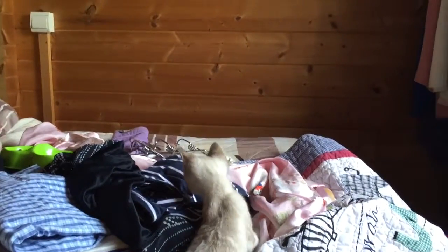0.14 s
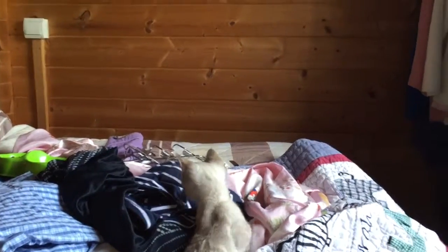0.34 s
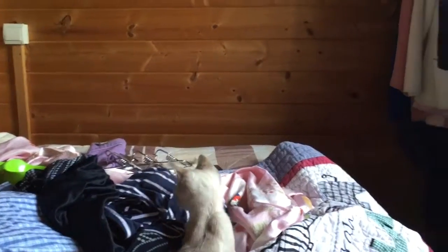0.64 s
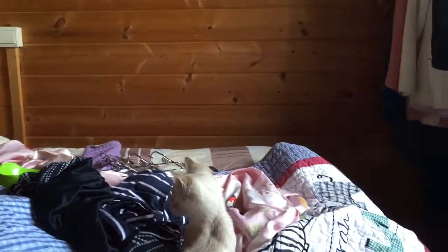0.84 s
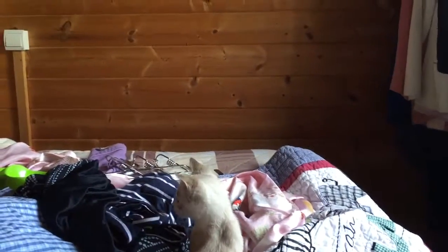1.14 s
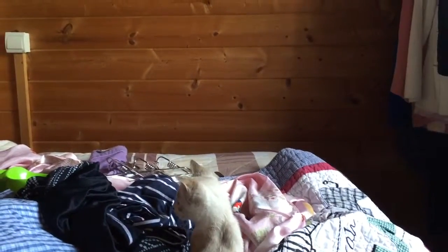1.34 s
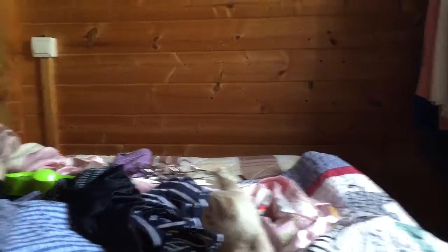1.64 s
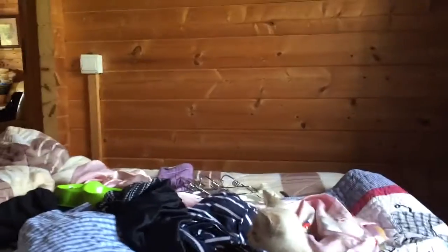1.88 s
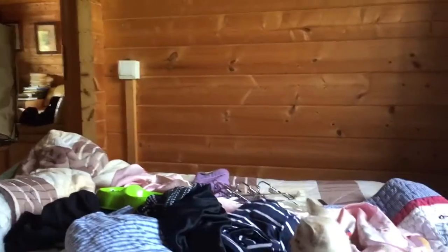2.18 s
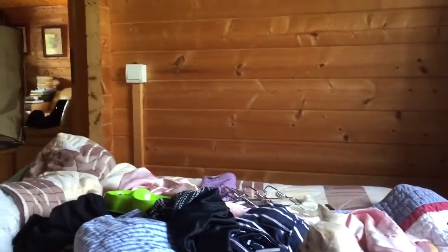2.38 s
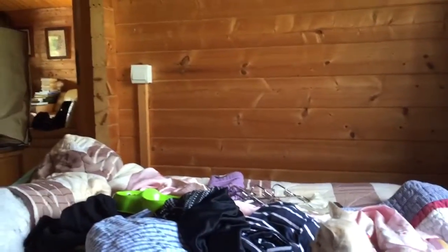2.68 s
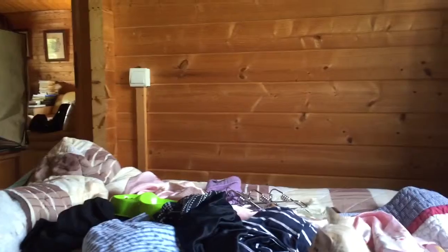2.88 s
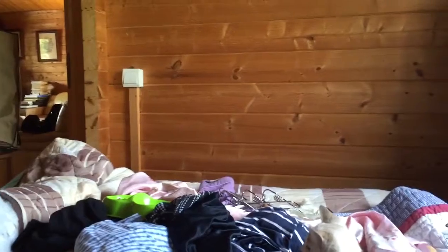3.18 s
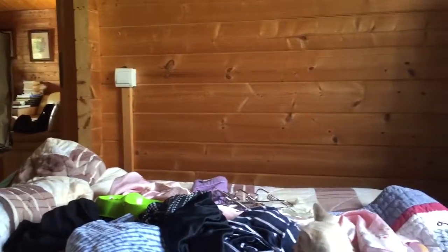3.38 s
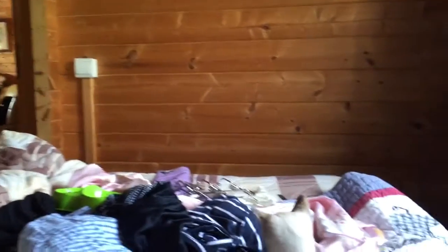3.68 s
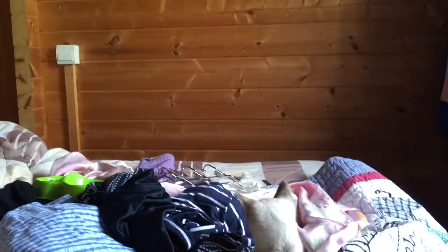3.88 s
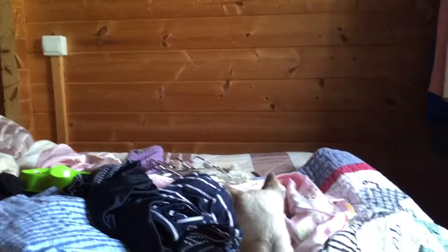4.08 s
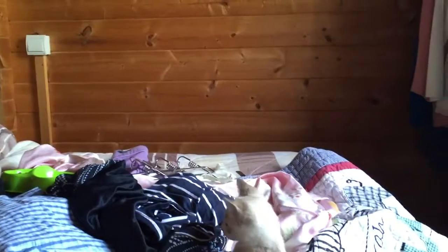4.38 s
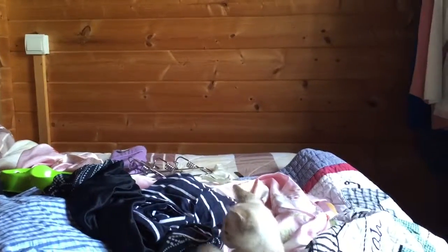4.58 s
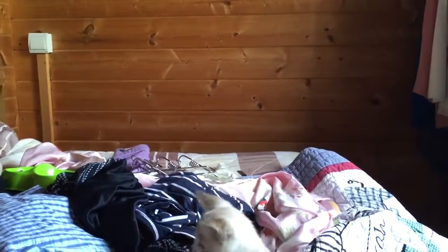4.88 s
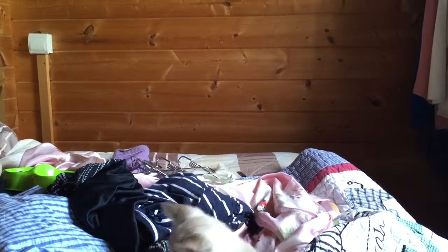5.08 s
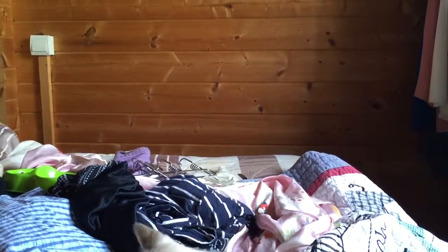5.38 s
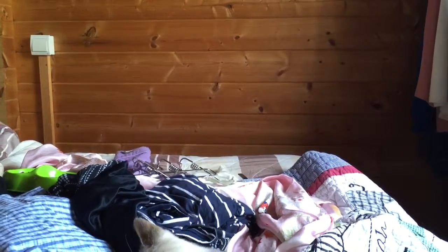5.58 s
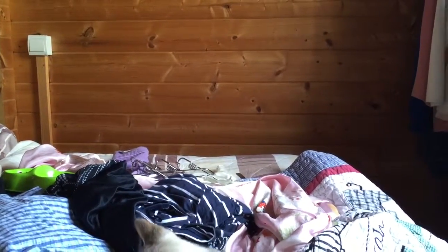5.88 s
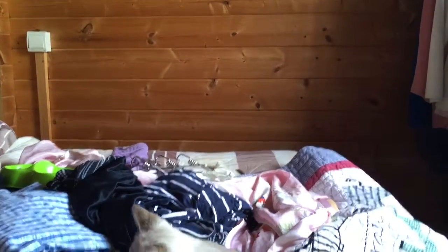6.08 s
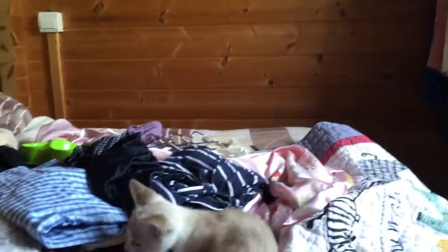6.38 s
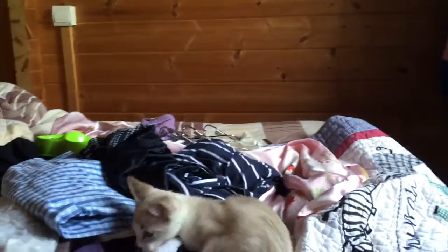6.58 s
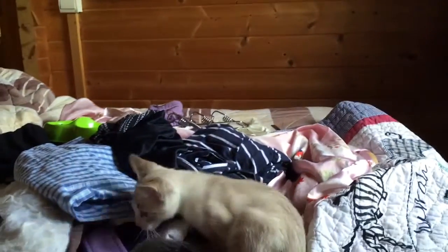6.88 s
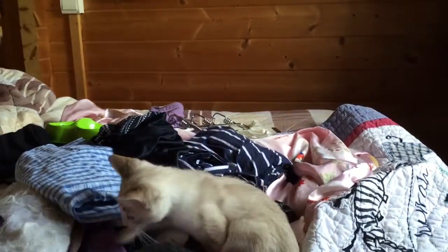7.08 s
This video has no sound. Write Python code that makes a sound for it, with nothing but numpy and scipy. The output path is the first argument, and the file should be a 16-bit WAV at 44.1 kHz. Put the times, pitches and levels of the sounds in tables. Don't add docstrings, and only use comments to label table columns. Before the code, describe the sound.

A small wooden room with very quiet, soft background air. From about 0.6 to 1.1 s a faint, very high thin whistle rides on a dog's breath; another, longer, sighs downward from 1.5 to 2.1 s, with tiny tag chinks and soft floor bumps. At 2.2 s a yelp falls steeply and sinks into a wavering whine until 2.8 s. Lip or claw ticks lead to a short, louder yelp at 3.0 s, with paw knocks on boards to 3.5 s and little peeps. Around 4.1 s comes a faint yelp, a small grunt and a weak whine to 4.6 s. A loud, hoarse bark bursts at 4.95 s, overloaded, its pitch dropping; a short whimper and whistle follow at 5.2-5.5 s, then a paw knock and a second, wider-open bark at 5.7 s. Short woody echoes. From 6.25 s, wavering whistles, breaths, paw thuds, a sniff at 6.85 s and a final squeak.

```python
import sys
import numpy as np
from scipy import signal
from scipy.fft import rfft, irfft, next_fast_len
from scipy.io import wavfile
from scipy.ndimage import uniform_filter1d, map_coordinates

SR = 44100
rng = np.random.default_rng(int(sys.argv[2]) if len(sys.argv) > 2 else 0)


def makeup_ratio(level_db):
    decades = np.asarray(level_db, float) / 20
    return 10 ** decades


def transcribe(signal):
    frames = np.atleast_2d(signal).T
    limited = np.clip(frames, -1, 1)
    pcm = np.round(limited * 32767).astype(np.int16)
    wavfile.write(sys.argv[1], SR, pcm)


N = 319119
TOP_HZ = 15560

# frequency_hz, density_db
HUSH_SPECTRUM = [(15, -45.5), (33, -11.5), (69, 3), (719, -14), (1650, -16), (2050, -14.5), (4020, -18.5),
                 (4980, -20), (9240, -22.5), (11800, -32), (13100, -29.5), (15400, -29.5)]
HUSH_DB = -71

# start_s, length_s, mouth_level_db, nose_level_db
PUFFS = [(0.621, 0.55, -75.5, -77.5), (1.456, 0.26, -64, -67), (1.74, 0.38, -66.5, -70.5),
         (2.047, 0.088, -63.5, -90), (2.129, 0.3, -70, -78), (3.364, 0.083, -76, -70.5),
         (3.497, 0.11, -66, -71), (4.171, 0.12, -65.5, -64.5), (2.175, 0.13, -57.5, -57.5),
         (2.814, 0.32, -61.5, -93.5), (3.579, 0.39, -67.5, -77.5), (3.905, 0.17, -69, -84),
         (4.6, 0.11, -68, -85.5), (5.402, 0.11, -68.5, -79.5), (5.597, 0.08, -60.5, -70),
         (6.297, 0.12, -61.5, -67), (6.471, .1, -70, -75.5), (6.718, 0.086, -71.5, -93),
         (6.83, 0.13, -70.5, -65.5), (6.992, 0.16, -59.5, -73.5)]
PUFF_PEAK, PUFF_FADE_DB = 0.38, -10
# frequency_hz, density_db
MOUTH_AIR = [(200, -8.5), (900, -7.5), (1550, -3.5), (2000, -8), (2550, -5.5), (3200, -7.5), (4200, -1),
             (5300, -6.5), (7000, -31.5)]
# frequency_hz, density_db
NOSE_AIR = [(5000, -14), (7000, -3.5), (9000, -4), (10500, -13.5), (13000, -15), (15500, -34)]

# start_s, pitch_hz, level_db, octave_level_db
STEADY_WHISTLES = [
    [(0.648, 6090, -62, -74), (0.658, 5987, -53, -63.5), (0.76, 5920, -46.5, -58),
     (0.798, 5908, -55.5, -66.5), (1.048, 5814, -46.5, -65), (1.13, 5817, -82, -80)],
    [(3.635, 5560, -67, -82), (3.65, 5690, -52.5, -66.5), (3.73, 5710, -64, -66), (3.782, 5700, -56.5, -65),
     (3.858, 5880, -61.5, -74), (3.9, 5560, -94, -111)],
    [(5.33, 5300, -86, -80.5), (5.382, 5390, -56, -58), (5.444, 5480, -62.5, -62),
     (5.466, 5500, -50, -50.5), (5.482, 5500, -51, -66.5), (5.53, 5210, -62.5, -62.5)],
]
# start_s, pitch_hz, level_db, octave_level_db
SIGH = [(1.49, 6020, -59, -81), (1.524, 5903, -40.5, -63), (1.604, 5890, -45.5, -72),
        (1.654, 5597, -44, -62), (1.73, 5630, -55.5, -73), (1.764, 5690, -52, -54),
        (1.964, 5473, -42, -57.5), (2.012, 5440, -52, -63), (2.07, 5400, -83, -92)]
# start_s, pitch_hz, level_db, octave_level_db
WAVERING_WHISTLES = [
    [(2.226, 6000, -50, -53), (2.238, 5816, -37, -38.5), (2.33, 5340, -53, -52), (2.352, 5605, -43.5, -49),
     (2.39, 5540, -45, -57), (2.402, 5590, -59, -88), (2.47, 5470, -85, -89)],
    [(6.27, 5720, -59.5, -56.5), (6.322, 5810, -42.5, -63), (6.448, 5380, -62.5, -65),
     (6.514, 5480, -35, -56), (6.562, 5457, -54, -63.5), (6.642, 5386, -43, -61), (6.73, 5570, -103, -99)],
    [(6.865, 5820, -72, -92), (6.873, 5800, -47, -46), (6.935, 5340, -44.5, -51), (6.973, 5470, -62.5, -52),
     (7.045, 5930, -50, -68), (7.141, 5480, -62, -105.5), (7.165, 5750, -85, -104)],
]
# start_s, length_s, first_pitch_hz, last_pitch_hz, peak_level_db
PEEPS = [(2.629, 0.25, 5475, 5530, -59), (3.057, 0.05, 5780, 5960, -48), (3.192, 0.1, 5710, 5670, -52.5),
         (3.478, .1, 6080, 5900, -58.5), (4.181, 0.13, 5970, 5670, -52), (4.302, 0.052, 5620, 5590, -63.5),
         (4.361, 0.36, 5690, 5720, -68), (4.536, 0.13, 5650, 5560, -57.5), (5.163, 0.037, 5390, 5330, -61),
         (6.817, 0.055, 6300, 6700, -57)]
PEEP_PEAK, PEEP_EDGE_DB = 0.37, -24
PEEP_OCTAVE_DB = -11.5
# start_s, length_s, pitch_scatter_percent
HOARSE_SPELLS = [(1.483, 0.26, 0.41), (2.216, 0.13, 1.53), (4.172, 0.086, 1.5), (4.539, 0.13, 0.93),
                 (6.254, 0.15, 0.96), (6.808, 0.08, 3.5), (6.998, 0.2, 1.7)]
# frequency_hz, level_db
MIXING_TONES = [(2200, -51.5), (3000, -33.5), (3700, -22), (4400, -21), (5000, -35.5), (6500, -38),
                (9500, -65), (13000, -59.5)]

# start_s, peak_level_db
TICKS = [(0.8844, -50), (1.586, -60), (2.6292, -48), (2.708, -43), (2.914, -46.5), (2.995, -38.5),
         (4.931, -52.5), (6.8394, -50.5), (3.645, -60.5), (6.38, -58)]
# start_s, peak_level_db, pitch_hz
CHINKS = [(1.1065, -62, 9150), (1.4721, -64, 9800), (2.0136, -55, 9035), (2.0515, -75.5, 8650),
          (3.956, -63, 9000), (5.292, -52, 9200), (5.6179, -49.5, 8800), (5.9874, -58.5, 8730),
          (7.0147, -53.5, 8720)]

# start_s, peak_level_db, low_knock_level_db, claw_level_db
PAWS = [(1.29, -39, -11.5, -43.5), (1.469, -55, -4, 2), (1.78, -52, 7, -17.5), (2.9239, -35, -8.5, -23),
        (3.1468, -23.5, -11, -42.5), (3.269, -17.5, -15, -29), (3.4411, -25.5, -9, -30.5),
        (3.963, -46.5, -5, -41), (5.5196, -17, -17, -32), (6.2401, -28.5, -13.5, -30),
        (6.5825, -20, -15, -31), (6.9366, -24.5, -12, -28)]
# frequency_hz, density_db
BOARDS = [(410, -35.5), (700, -18.5), (1120, -8), (1830, -4.5), (2060, -1.5), (2650, -11.5), (3670, -14.5),
          (4990, -24), (5570, -28), (7500, -41.5), (9750, -78), (16500, -120)]
# frequency_hz, density_db
LOW_KNOCK = [(150, -28.5), (300, -4), (700, 0.5), (1000, -33), (2500, -81)]
# frequency_hz, density_db
CLAW = [(3000, -61.5), (5500, -15), (7500, -5), (12000, -7.5), (15500, -13)]
# start_s, peak_level_db, pitch_hz, t60_s
THUMPS = [(1.301, -57.5, 61.9, 0.19), (1.81, -38, 134, 0.12), (2.928, -38.5, 166, 0.15),
          (2.997, -52, 209, 0.45), (3.15, -48.5, 82, 0.16), (3.16, -40.5, 170, 0.28),
          (1.305, -59.5, 180, 0.19), (3.671, -60, 130, 0.19), (3.278, -46, 231, 0.21), (3.5, -44, 230, 0.2),
          (3.599, -54, 74.5, 0.16), (3.971, -43, 223, 0.152), (4.348, -54, 143, 0.21),
          (5.358, -62, 58, 0.43), (5.523, -42, 194, 0.23), (5.725, -42.5, 41, 0.13), (5.66, -53, 59, 0.13),
          (5.2, -65, 60, 0.16), (5.98, -58, 234, 0.2), (6.246, -53, 224, 0.28), (6.588, -45, 240, 0.22),
          (6.712, -45, 79, 0.19), (6.801, -43.5, 71, 0.066), (6.942, -47.5, 240, 0.21),
          (7.089, -53, 68, 0.16), (6.8, -56.5, 61, 0.29), (5.35, -54.5, 360, 0.21),
          (4.955, -46.5, 170, 0.17)]

# start_s, length_s, pitch_hz
NARROW_BANDS = [(1.5, .11, 4050), (1.55, .09, 1450), (1.57, .06, 2450), (1.8, .11, 2450), (1.82, .16, 3700),
                (2.055, .07, 4000), (2.06, .04, 1200), (2.18, .08, 2400), (4.11, .08, 2400), (4.12, .06, 1800),
                (4.59, .045, 3850), (4.86, .05, 3800), (5.03, .1, 560), (5.2, .07, 4080), (5.31, .09, 4050),
                (5.88, .08, 520)]
NARROW_BAND_DB = [-69, -64, -73, -76, -71, -65, -64, -54, -65, -51, -62.5, -73, -40, -74, -61, -63]
NARROW_BAND_WIDTH = 0.047

# start_s, pitch_hz, level_db
YELPS = [
    [(2.205, 1493, -58), (2.219, 1453, -30), (2.257, 1362, -31.5), (2.31, 1098, -46), (2.335, 945, -31.5),
     (2.39, 903, -29.5), (2.415, 803, -25.5), (2.427, 740, -43)],
    [(3.008, 1223, -40), (3.024, 1168, -22), (3.034, 1095, -20), (3.043, 1122, -31), (3.05, 1117, -24),
     (3.064, 1082, -31.5), (3.072, 814, -38.5), (3.13, 686.5, -39), (3.165, 687, -34.5)],
    [(4.068, 965, -66), (4.088, 986, -47.5), (4.112, 1042, -41.5), (4.124, 932, -38), (4.165, 656, -40),
     (4.2, 617, -57)],
]
# start_s, pitch_hz, level_db
WHINES = [
    [(2.425, 732, -46.5), (2.44, 721, -32), (2.48, 677, -37), (2.53, 657.3, -42), (2.605, 682, -34),
     (2.668, 647, -45.5), (2.695, 658.8, -37.5), (2.725, 679, -43), (2.775, 676, -75)],
    [(4.25, 567, -54.5), (4.29, 583.5, -55.5), (4.41, 680, -41.5), (4.445, 634, -51), (4.465, 656, -42.5),
     (4.578, 664, -48), (4.61, 656, -79)],
    [(5.18, 687, -56.5), (5.22, 673, -34.5), (5.268, 646, -60), (5.29, 626, -45.5), (5.328, 680, -37),
     (5.36, 686, -62.5)],
]
# start_s, pitch_hz, level_db
GRUNT = [
    (4.191, 373, -63),
    (4.212, 367, -47.5),
    (4.25, 362, -73),
]
MANNER = [
    (0.04, 0.03),
    (0, 0.07),
    (0, 0.2),
    (0.02, 0.01),
    (0, 0.02),
    (0, 0.07),
    (-.5, 0.15),
]
# start_s, opening_0_to_1
MOUTH_MOVES = [(2.205, 1), (2.235, 0.47), (2.25, 0), (2.33, 0), (2.38, 0), (2.395, 0.4), (2.415, 0.1),
               (2.43, 0.05), (2.48, 0.15), (2.52, 0.55), (2.57, 0.46), (2.6, 0), (2.645, 0.8), (2.7, 0.26),
               (2.76, 0.47), (3.01, 0.42), (3.06, 0.18), (3.16, 0.03), (4.07, 0.1), (4.1, 0), (4.15, 0.1),
               (4.18, 0.44), (4.2, 0), (4.26, 0), (4.36, 0.37), (4.41, 0), (4.5, 0.08), (4.6, 0), (5.18, 0),
               (5.23, 0.08), (5.27, 0.2), (5.33, 0), (5.36, 0)]
# start_s, level_db
BARK_EFFORT = [
    [(4.937, -43), (4.944, -25), (4.955, -11), (4.985, -8.5), (5.015, -9.5), (5.03, -16.5), (5.06, -19),
     (5.068, -31.5), (5.097, -30)],
    [(5.704, -48.5), (5.711, -26.5), (5.719, -21), (5.735, -7), (5.748, -10), (5.768, -9.5), (5.785, -14.5),
     (5.797, -10.5), (5.84, -30.5)],
]
BARK_MANNER = [
    (0.501, 0.51),
    (.92, 0.5),
]
# start_s, pitch_hz
BARK_STEPS = [(4.939, 1000), (4.974, 878), (4.994, 742), (5.042, 715), (5.707, 1135), (5.724, 870),
              (5.732, 820), (5.746, 788), (5.79, 806), (5.815, 797)]
BARK_AJAR, BARK_OPENS_S = 0.26, 0.04
STEP_S = 0.006
# second_db, third_db, fourth_db, higher_db
OVERTONES = [
    (-4, 2, -2, -1.5),
    (1.5, 0, -2, 2.5),
    (5, -16, -20, -4),
    (-2.5, -10.5, -9, -8),
    (-1.5, -4.5, 0, -5),
    (-1.5, 9, -5, -16),
    (-9, 0, 0, 0),
    (0.5, -2, -3, -1),
    (2, -0.5, 0, -1.5),
]
# frequency_hz, level_db
THROAT_SHUT = [(300, 19.5), (1400, -6), (1750, -36.5), (2000, -16), (2480, -12.5), (2700, -25),
               (3400, -32.5), (5200, -49.5), (7000, -32), (14000, -55.5)]
# frequency_hz, level_db
THROAT_OPEN = [(300, -19), (750, -24.5), (1000, 4), (1600, 0), (2400, -3.5), (3200, -5), (4000, -11),
               (4900, -28), (5500, -43.5), (14000, -76)]
# frequency_hz, density_db
RASP = [(300, -64), (600, -20), (750, -5.5), (1000, 3), (1250, -8), (1600, 5), (2400, -5.5), (3700, -12.5),
        (4400, -33), (6500, -32.5), (9000, -20.5), (12000, -38.5), (15500, -39)]
# frequency_hz, density_db
LEAKING_AIR = [(1500, -33.5), (2600, -1), (4200, 1), (5200, -10.5), (7000, -13), (9500, -8), (13000, -15),
               (15500, -31)]
FLUTTER_DB, HOARSE = 2.5, 0.07

# start_s, level_db
SNIFF = [
    (6.825, -69),
    (6.85, -52.5),
    (6.885, -58.5),
    (6.915, -80),
]
# frequency_hz, density_db
SNIFF_AIR = [(900, -38), (1400, -22.5), (1700, 4.5), (2300, 0), (2700, -1), (4000, -5), (4500, -18.5),
             (7000, -27.5)]

# frequency_hz, t60_s
ROOM_DECAY = [(200, 0.073), (700, 0.15), (2000, 0.13), (5000, 0.15), (12000, 0.19)]
# frequency_hz, t60_s
HOUSE_DECAY = [(300, 0.18), (520, 0.61), (780, .16), (1000, 0.48), (1600, 0.2), (2400, 0.34), (3200, 0.16),
               (4200, 0.37), (9000, 0.088)]
# frequency_hz, level_db, t60_s
RINGING_BOARDS = [(1015, -11, .4), (1055, -15, .35), (1480, -12, .2), (1570, -13, .35), (1597, -11, .4),
                  (1886, -12, .3), (2030, -12, .22), (2335, -17, .5), (2390, -17, .45), (2460, -18, .5),
                  (3125, -17, .3), (3730, -14, .2), (6740, -12, .2)]
RINGING_DB = -30
KNEE = 6


def unit(x):
    return x / np.sqrt(np.mean(x ** 2) + 1e-20)


def along(points, hz):
    f, v = np.transpose(points)
    return np.interp(np.log(hz + 1), np.log(f + 1), v)


def phrase(rows):
    s, *columns = np.transpose(rows)
    at = np.arange(round(s[0] * SR), min(round(s[-1] * SR), N))
    from_edge = np.minimum(at - at[0], (at[-1] - at) / 4)
    gate = np.clip(from_edge / (0.00045 * SR), 0, 1)
    return at, gate, [np.interp(at / SR, s, column) for column in columns]


def wobble(rate, size):
    knots = rng.standard_normal(int(size * rate / SR) + 4)
    return map_coordinates(knots, [np.arange(size) * rate / SR])


def noise(spectrum, size, pulsing=1):
    m = next_fast_len(size + 2048)
    white = rng.standard_normal(m) * np.resize(pulsing, m)
    colour = makeup_ratio(along(spectrum, np.fft.rfftfreq(m, 1 / SR)))
    return unit(irfft(rfft(white) * colour, m)[:size])


def hush():
    return makeup_ratio(HUSH_DB + 1.2 * wobble(4, N)) * noise(HUSH_SPECTRUM, N)


def breath():
    sound = np.zeros(N)
    for s, length, mouth_db, nose_db in PUFFS:
        puff = [(s, -4), (s + PUFF_PEAK * length, 0), (s + length, PUFF_FADE_DB)]
        at, _, (fade_db,) = phrase(puff)
        mouth_level = makeup_ratio(mouth_db + fade_db + 1.6 * wobble(30, len(at)))
        nose_level = makeup_ratio(nose_db + fade_db + 3.4 * wobble(35, len(at)))
        air = mouth_level * noise(MOUTH_AIR, len(at)) + nose_level * noise(NOSE_AIR, len(at))
        swell = np.clip(np.minimum(at - at[0], at[-1] - at) / (0.02 * SR), 0, 1)
        sound[at] += swell * air
    return sound


def whistles():
    shape = [(0, PEEP_EDGE_DB), (PEEP_PEAK, 0), (1, PEEP_EDGE_DB)]
    peeps = []
    for s, length, hz, last_hz, db in PEEPS:
        peeps.append([(s + u * length, hz + u * (last_hz - hz), db + edge_db, db + edge_db + PEEP_OCTAVE_DB)
                      for u, edge_db in shape])
    return [SIGH] + WAVERING_WHISTLES + STEADY_WHISTLES + peeps


def whistle(folds):
    sound = np.zeros(N)
    k = np.array([-4, -3, -2, -1, 1, 2, 3, 4])[:, None]
    scatter = np.zeros(N)
    for s, length, percent in HOARSE_SPELLS:
        scatter[round(s * SR):round((s + length) * SR)] = percent / 100
    scatter = uniform_filter1d(scatter, size=900)
    for rows in whistles():
        at, gate, (hz, db, octave_db) = phrase(rows)
        size = len(at)
        low_phase, low_hz, low_size = folds[:, at]
        drift = 0.004 * wobble(120, size) + 0.0043 * wobble(25, size) + scatter[at] * wobble(400, size)
        phase = 2 * np.pi * np.cumsum(hz * (1 + drift)) / SR
        pair = makeup_ratio(db) * np.sin(phase) + makeup_ratio(octave_db) * np.sin(2 * phase)
        broken_db = np.array([5 * wobble(60, size) for _ in k])
        slip = 0.65 * wobble(110, size)
        mixing_levels = makeup_ratio(along(MIXING_TONES, np.abs(hz + k * low_hz)) + broken_db)
        mixed = np.sum(mixing_levels * np.sin(phase + k * low_phase + slip), axis=0)
        flutter = makeup_ratio(0.83 * wobble(40, size) + 2.0 * wobble(130, size))
        sound[at] += np.sqrt(2) * gate * (flutter * pair + low_size * mixed)
    return sound


def ticks():
    sound, t = np.zeros(N + SR), np.arange(SR // 8) / SR
    for s, db in TICKS:
        envelope = makeup_ratio(db - 7 - 60 * t / 0.04) * (1 - np.exp(-t / 0.0014))
        sound[round(s * SR):][:len(t)] += envelope * noise(CLAW, len(t))
    return sound[:N]


def tag():
    sound, t = np.zeros(N + SR), np.arange(SR // 8) / SR
    for s, db, hz in CHINKS:
        band = [(hz * 0.6, -70), (hz * 0.8, -35), (hz * 0.95, -12), (hz, 0),
                (hz * 1.05, -12), (hz * 1.2, -35), (hz * 1.5, -70)]
        envelope = makeup_ratio(db - 4.0 - 60 * t / 0.16) * (1 - np.exp(-t / 0.0024))
        sound[round(s * SR):][:len(t)] += envelope * noise(band, len(t))
    return sound[:N]


def paws():
    sound, t = np.zeros(N + SR), np.arange(SR // 10) / SR
    landing = (1 - np.exp(-t / 0.008)) ** 1.7
    for s, db, low_db, claw_db in PAWS:
        boards = noise(BOARDS, len(t))
        knock = makeup_ratio(low_db) * noise(LOW_KNOCK, len(t))
        claws = makeup_ratio(claw_db + 10.5 - 60 * t / 0.21) * noise(CLAW, len(t))
        sound[round(s * SR):][:len(t)] += makeup_ratio(db + 0.5 - 60 * t / 0.1) * landing * (boards + knock + claws)
    return sound[:N]


def thumps():
    sound, t = np.zeros(N + SR), np.arange(SR // 3) / SR
    for s, db, hz, t60 in THUMPS:
        if hz > 90:
            spectrum = [(20, -22), (70, -4), (hz, 0), (hz * 1.8, -12), (hz * 5, -35), (hz * 12, -90)]
        else:
            spectrum = [(20, -20), (hz, 0), (160, -20), (500, -40), (1200, -90)]
        envelope = makeup_ratio(db + 9.0 - 60 * t / t60) * (1 - np.exp(-t / 0.043))
        sound[round(s * SR):][:len(t)] += envelope * noise(spectrum, len(t))
    return sound[:N]


def narrow_bands():
    sound = np.zeros(N)
    for (s, length, hz), db in zip(NARROW_BANDS, NARROW_BAND_DB):
        size = round(length * SR)
        near, far = hz * NARROW_BAND_WIDTH, 4 * hz * NARROW_BAND_WIDTH
        band = [(hz / 2, -90), (hz - far, -40), (hz - near, -8), (hz, 0),
                (hz + near, -8), (hz + far, -40), (hz * 2, -90)]
        swell = np.sqrt(np.hanning(size))
        sound[round(s * SR):][:size] += makeup_ratio(db) * swell * noise(band, SR // 4)[:size]
    return sound


def calls():
    for rows, (mouth, rough) in zip(YELPS + WHINES + [GRUNT], MANNER):
        at, gate, (hz, db) = phrase(rows)
        yield at, gate, hz, db, mouth + np.interp(at / SR, *np.transpose(MOUTH_MOVES)), rough
    steps_s, steps_hz = np.transpose(BARK_STEPS)
    for rows, (mouth, rough) in zip(BARK_EFFORT, BARK_MANNER):
        at, gate, (db,) = phrase(rows)
        step = np.maximum(np.searchsorted(steps_s, at / SR + 1e-4) - 1, 0)
        hz = uniform_filter1d(steps_hz[step], size=round(STEP_S * SR))
        opening = np.clip(BARK_AJAR + (at - at[0]) / SR / BARK_OPENS_S, 0, 1)
        yield at, gate, hz, db, mouth * opening, rough * opening


def voice():
    sound, folds = np.zeros(N), np.zeros((3, N))
    k = np.arange(1, 17)[:, None]
    for (at, gate, hz, db, mouth, rough), trim_db in zip(calls(), OVERTONES):
        size = len(at)
        strain = np.clip((db + 18) / 80, 0, 0.12)
        mouth, rough = np.minimum(mouth, 1.1), np.clip(rough + strain, 0, 0.95)
        jitter = (0.006 + 0.03 * rough ** 2) * wobble(150, size)
        phase = 2 * np.pi * np.cumsum(hz * (1 + jitter)) / SR
        broken_db = np.array([3 * (1 - rough.max()) * np.log(j + 1.1) * wobble(60, size)
                              for j in range(len(k))])
        throat_db = (1 - mouth) * along(THROAT_SHUT, k * hz) + mouth * along(THROAT_OPEN, k * hz)
        call_db = np.take((0, *trim_db), k - 1, mode="clip")
        sizes = makeup_ratio(throat_db + call_db) * (k * hz < TOP_HZ)
        flutter_db = FLUTTER_DB * np.minimum(rough / HOARSE, 1) * wobble(120, size)
        waves = np.sin(k * phase + 0.6 * k * k)
        tone = np.sum(sizes * makeup_ratio(broken_db + flutter_db) * waves, axis=0)
        tone = tone / np.sqrt(np.sum(sizes ** 2, axis=0) / 2)
        rasp = noise(RASP, size, 1 + 0.51 * np.cos(phase))
        leak = makeup_ratio(-29.0) * noise(LEAKING_AIR, size)
        sound[at] += gate * makeup_ratio(db) * (np.sqrt(1 - rough ** 2) * tone + rough * rasp + leak)
        folds[:, at] = phase, hz, gate * makeup_ratio(db)
    return sound, folds


def sniff():
    sound = np.zeros(N)
    at, gate, (db,) = phrase(SNIFF)
    sound[at] += gate * makeup_ratio(db) * noise(SNIFF_AIR, len(at))
    return sound


def tail(decays):
    hz, t, z = signal.stft(rng.standard_normal(SR), SR, nperseg=256)
    fading = makeup_ratio(-60 * t / along(decays, hz)[:, None])
    answer = signal.istft(z * fading, SR, nperseg=256)[1]
    return answer / np.linalg.norm(answer)


def room(x):
    t = np.arange(SR) / SR
    boards = sum(makeup_ratio(db - 60 * t / t60) * np.sin(2 * np.pi * hz * t) for hz, db, t60 in RINGING_BOARDS)
    answer = makeup_ratio(-4.5) * tail(ROOM_DECAY) + makeup_ratio(-22) * tail(HOUSE_DECAY)
    answer[:SR] += makeup_ratio(RINGING_DB) * boards[:len(answer)] / np.sqrt(SR / 100)
    return signal.fftconvolve(np.pad(x, (200, 0)), answer)[:N]


def scene():
    low, folds = voice()
    throat = low + whistle(folds)
    air = breath() + narrow_bands() + sniff()
    dog = throat + air + paws() + tag() + ticks()
    return (makeup_ratio(-0.5) * dog + room(dog) + thumps() + hush())[None]


def low_pass(x):
    return signal.sosfilt(signal.butter(12, 15680, fs=SR, output="sos"), x)


def record(dry):
    square = dry ** 2
    bent = dry + 0.003 * (square - uniform_filter1d(square, size=900, axis=1))
    rounded = bent / (1 + np.abs(bent / 0.74) ** KNEE) ** (1 / KNEE)
    banded = irfft(rfft(rounded) * (np.fft.rfftfreq(N, 1 / SR) < TOP_HZ), N)
    return low_pass(banded)


dry = scene()
out = record(dry)
transcribe(out)
```